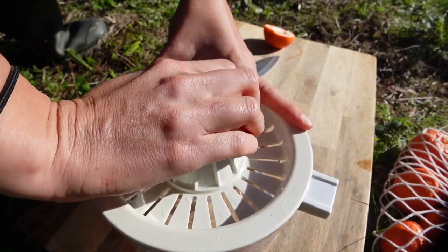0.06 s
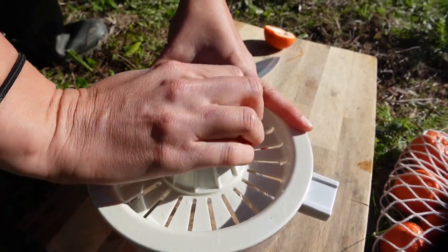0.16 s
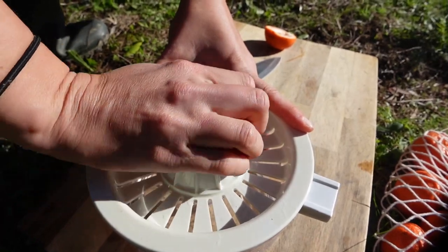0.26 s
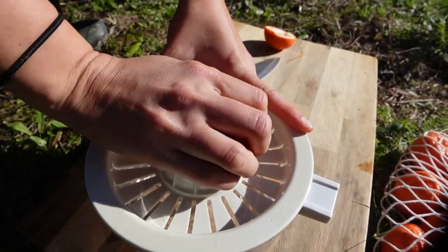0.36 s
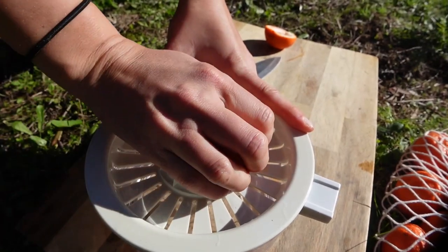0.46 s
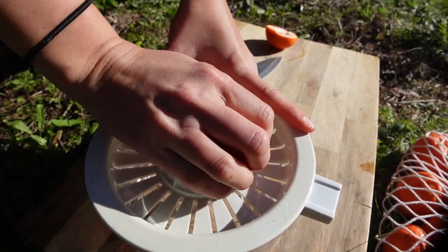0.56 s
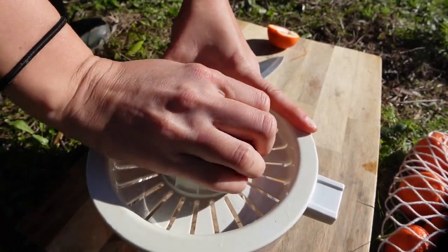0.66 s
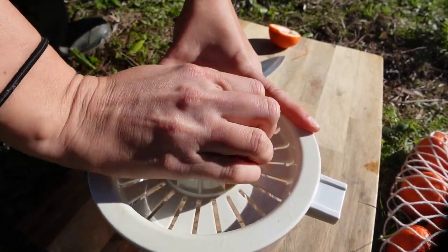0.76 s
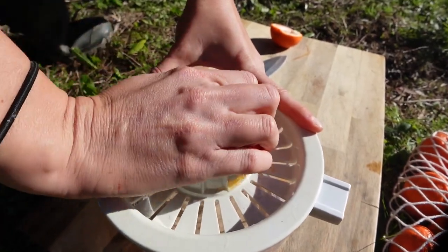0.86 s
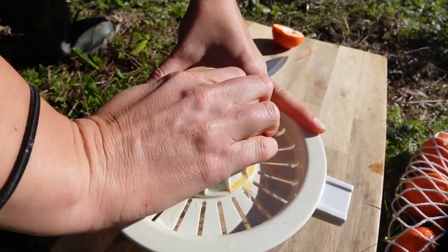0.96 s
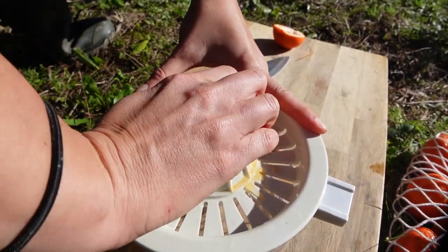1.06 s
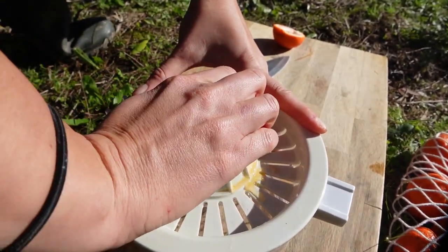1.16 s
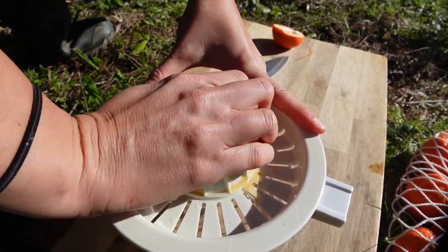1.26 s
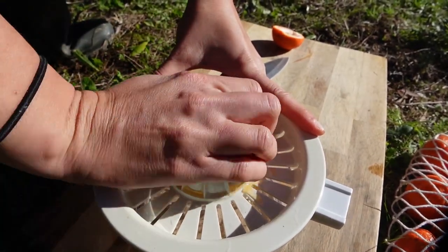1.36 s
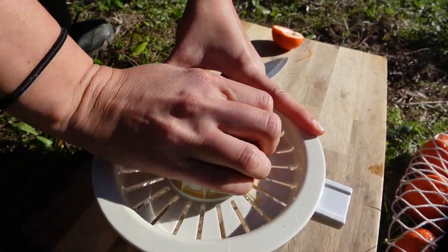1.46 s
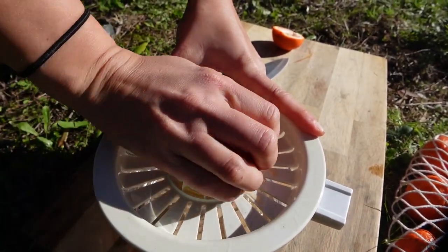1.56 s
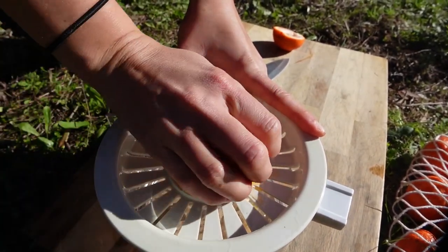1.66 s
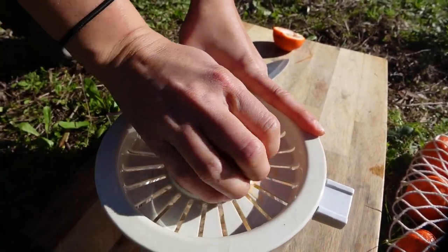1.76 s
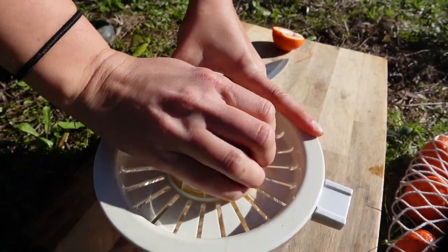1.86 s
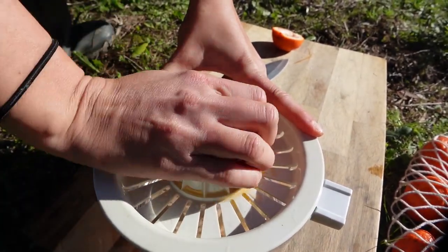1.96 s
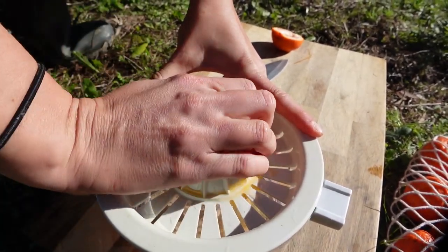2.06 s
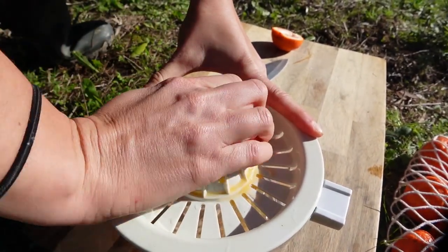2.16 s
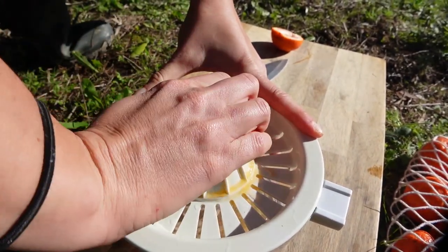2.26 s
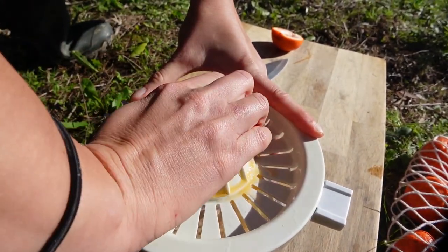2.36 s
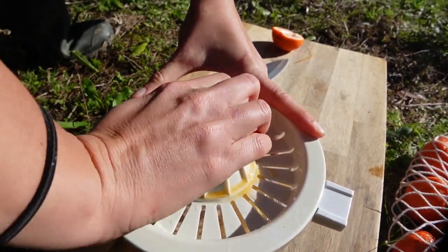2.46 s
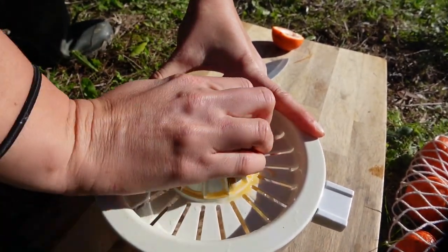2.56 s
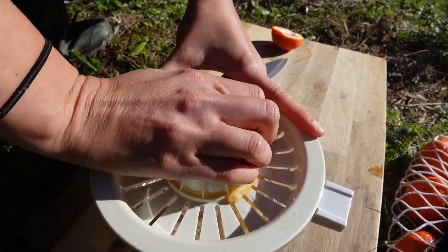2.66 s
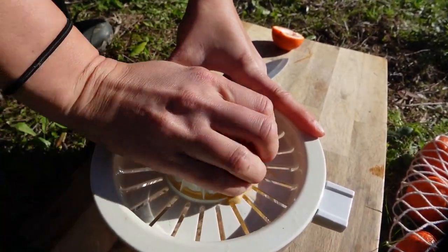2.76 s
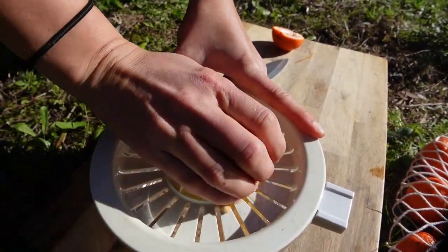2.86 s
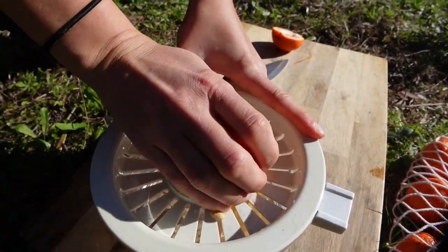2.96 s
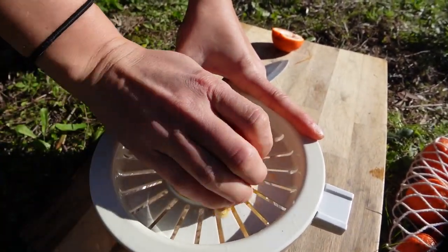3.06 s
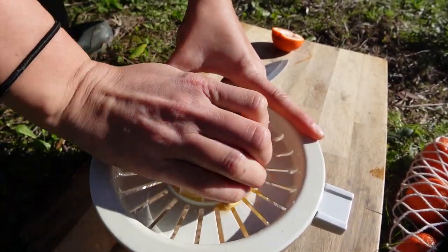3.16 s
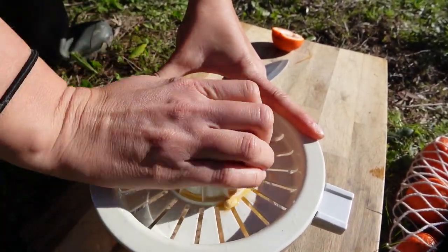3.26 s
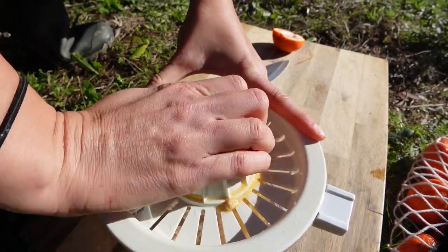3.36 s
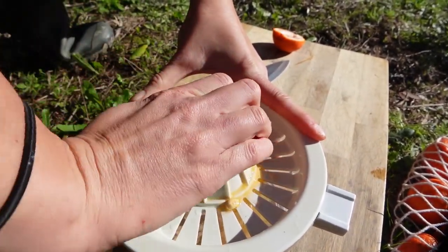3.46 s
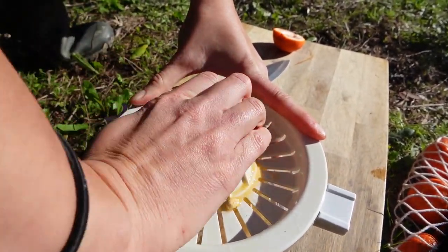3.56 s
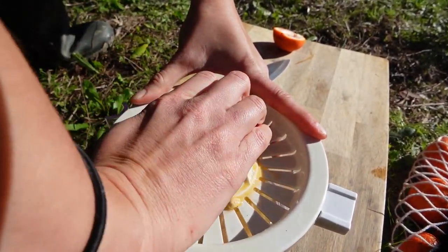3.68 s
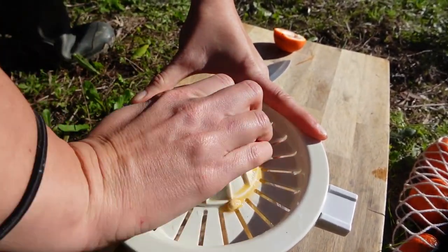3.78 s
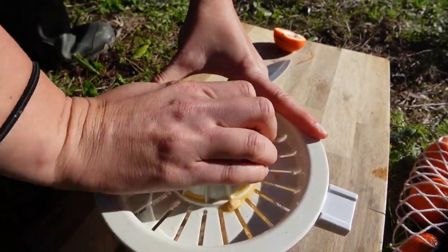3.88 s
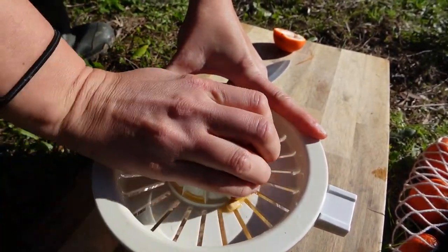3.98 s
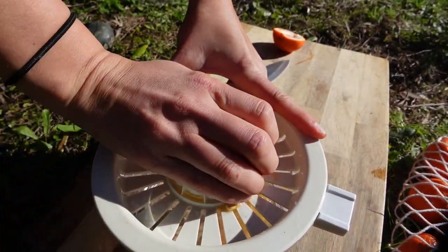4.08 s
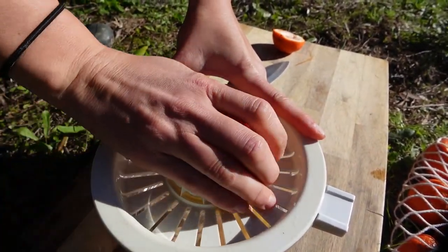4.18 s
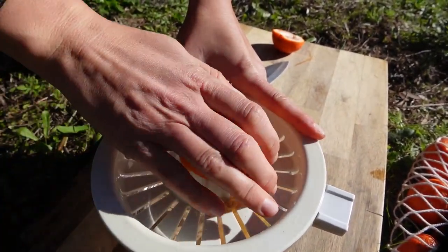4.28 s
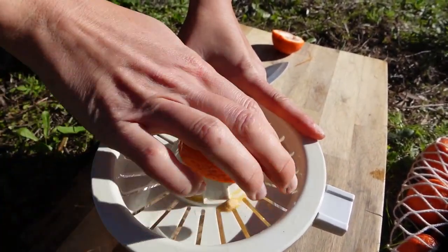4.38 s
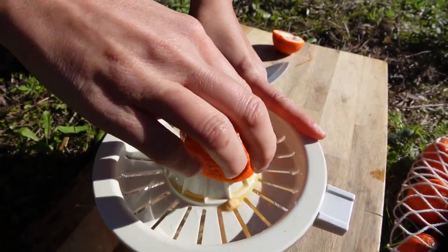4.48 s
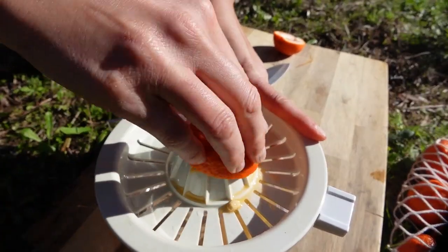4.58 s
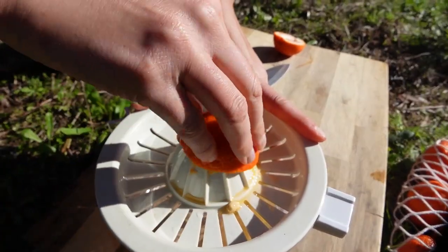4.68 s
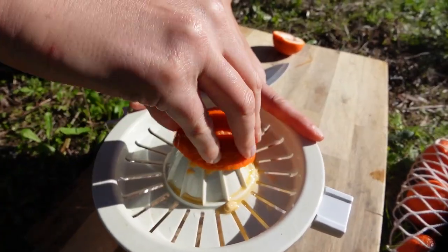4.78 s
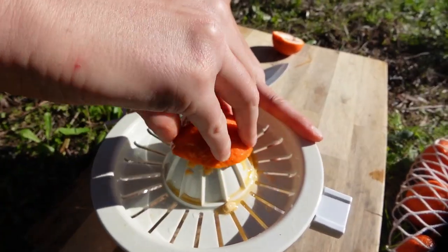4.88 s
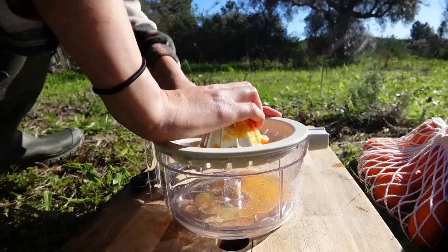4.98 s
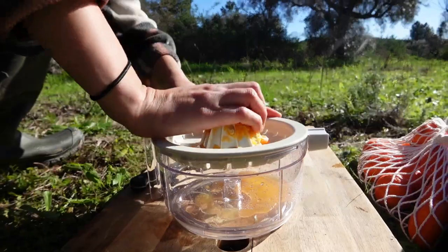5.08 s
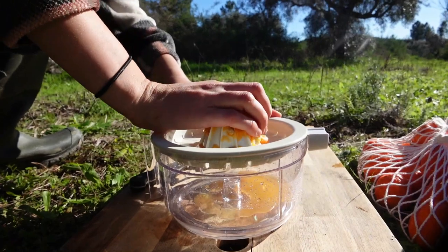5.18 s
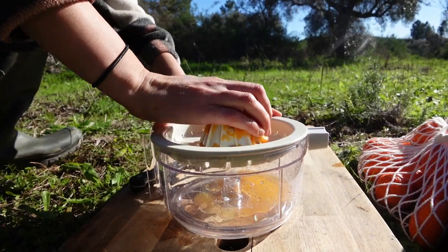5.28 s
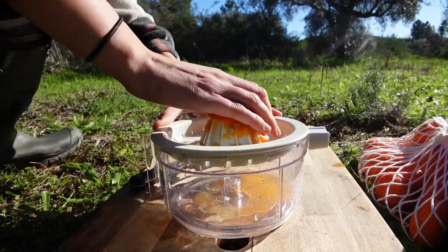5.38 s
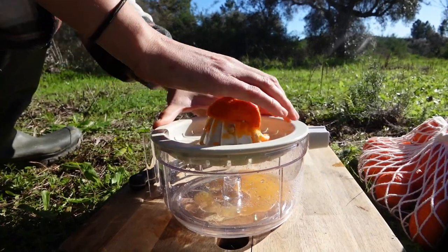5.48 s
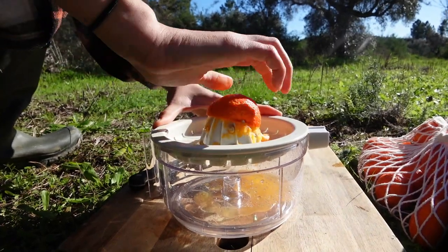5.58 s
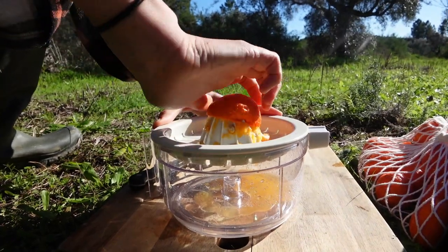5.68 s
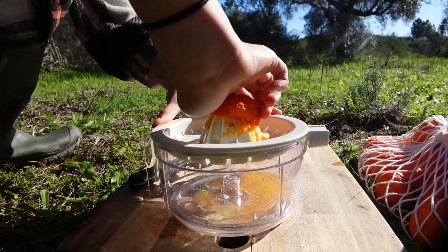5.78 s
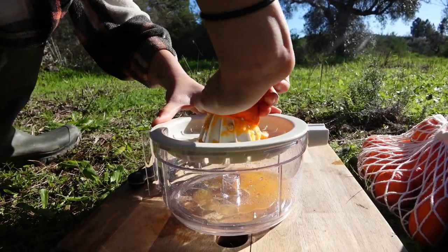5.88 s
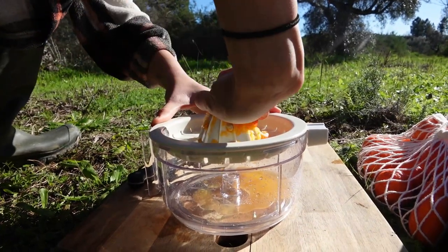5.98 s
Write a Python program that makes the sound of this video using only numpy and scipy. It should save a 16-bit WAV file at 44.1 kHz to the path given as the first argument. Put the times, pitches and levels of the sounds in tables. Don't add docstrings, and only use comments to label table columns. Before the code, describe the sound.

A close, dry outdoor sound of oranges juiced by hand on a ridged plastic reamer. From 0 s wet fibres crackle and ridges tick, with a faint rubbing squeak; a hard clack and crunch at about 0.4-0.5 s is the loudest moment. Knocks follow near 0.7 and 1.0 s, then a cluster of rind snaps from 1.3 to 1.7 s. Around 1.9-2.2 s the lid raps quickly on the bowl, and again at 2.6 s. Twisting continues in juicy surges, with softer hollow knocks at 3.1-3.4 s and sharp cracks at 3.8-4.1 s, thinning after 4.2 s. At 4.85 s the sound changes with the view: short squelches, plastic knocks at 5.0-5.2 s, then lighter tearing and a last push near 6 s. From 5.2 s a small bird repeats raspy, falling scolds about every 0.2 s. A faint field hush and low rumble lie beneath.

```python
import sys
import numpy as np
from scipy import signal
from scipy.fft import rfft, irfft, next_fast_len
from scipy.io import wavfile
from scipy.ndimage import map_coordinates

SR = 44100
rng = np.random.default_rng(int(sys.argv[2]) if len(sys.argv) > 2 else 0)


def store_wav(level_fs):
    pcm = np.round(np.clip(np.atleast_2d(level_fs), -1, 1) * 32767)
    wavfile.write(sys.argv[1], SR, pcm.T.astype(np.int16))


def decibels_to_gain(level_db):
    exponent = np.asarray(level_db, float) / 20
    return 10 ** exponent


N = 265923
VIEW_CHANGE_S = 4.85

# (frequency [Hz], level [dB])
HUSH_SPECTRUM = [(20, -50), (48, -30), (62, -7), (100, -1.5), (344, -4), (641, -2.5), (1500, -3.5),
                 (2400, -8.5), (4250, -7.5), (7000, -18.5), (9570, -19.5), (16000, -23)]
# (time [s], level [dB])
RUMBLE_LEVEL = [(0.0, -64), (0.1, -78), (4.9, -72), (5.2, -80), (5.5, -80), (5.62, -69.5), (5.8, -69.5),
                (5.9, -74.5)]
# (start [s], peak level [dB], first pitch [Hz], share of the usual fading [1])
BIRD_PHRASES = [
    (5.179, -46.5, 4430, -.4),
    (5.3638, -45, 4810, 0.7),
    (5.5582, -43.5, 4870, 1.3),
    (5.7476, -45.5, 4800, 1.0),
    (6.0, -49.5, 4160, 1.5),
]
# (delay [s], level [dB], pitch change [1])
BIRD_NOTES = [
    (0, 0, 0.013),
    (.02, 0, -.01),
    (0.046, -2.5, -.11),
    (.074, -6.5, -.15),
]
# (frequency [Hz], width [Hz], level [dB])
BOWL_MODES = [
    [(297, 79, -6.5), (401, 44, 6), (519, 67, 7), (740, 52, -2.5)],
    [(290, 170, -4), (440, 42, -20), (500, 135, 11.5), (713, 130, 9.5)],
]
# (frequency [Hz], width [Hz], level [dB])
LID_MODES = [
    [(1114, 46, 0), (1226, 30, 1.5), (1349, 83, 3.5), (1570, 170, -6), (2000, 65, -1)],
    [(1108, 78, 4), (1200, 79, 3), (1371, 54, 11), (1600, 84, -0.5), (2220, 120, 0.5)],
]
# (frequency [Hz], width [Hz], level [dB])
RIDGE_MODES = [(2700, 30, 3), (3040, 11, -3.5), (3400, 40, -18), (4480, 330, -5.5), (5300, 280, -22.5),
               (6870, 160, -12)]
# (start [s], length [s])
RUB_TIMES = [(0.0, .55), (.75, .35), (1.4, .4), (4.86, .1)]
RUB_LEVELS = [-69.5, -68, -65, -63.5]
# (time [s], peak level [dB], pitch [Hz])
FIBRE_POPS = [(0.04, -45, 4930), (.1175, -45, 6900), (.134, -49, 7400), (.189, -42.5, 8150),
              (0.2666, -42, 7400), (0.2855, -35.5, 6700), (0.4147, -34.5, 9850), (0.4613, -25, 5300),
              (0.4707, -36, 6400), (0.8347, -46.5, 7300), (.841, -48.5, 10500), (.953, -39.5, 6540),
              (1.316, -29, 4340), (1.516, -39, 5300), (1.578, -32, 3850), (2.095, -40, 6000),
              (2.485, -45, 4300), (2.4902, -38, 4060), (2.6856, -44, 6500), (3.2464, -46, 7140),
              (3.2956, -45, 5660), (3.9503, -40, 9100), (4.2177, -47.5, 9450), (4.326, -47.5, 5850),
              (4.652, -40, 6030), (4.8102, -44, 6240), (4.8977, -46, 4600), (4.9322, -44, 4000),
              (5.3352, -56, 6100), (5.3486, -55.5, 7600)]
CRUSH_STARTS = [.398, 1.772, .283, 3.93, 2.92, 4.915, 5.635, 1.865]
# (length [s], level [dB], pitch [Hz], bowl share [1])
CRUSH_BURSTS = [(0.044, -41, 4100, 0.87), (0.04, -53, 2650, .05), (0.036, -51, 4000, 0.11),
                (0.041, -50.5, 5100, .05), (0.036, -55, 860, 0.16), (0.026, -58, 1100, 0.11),
                (0.033, -64.5, 580, .1), (0.03, -58, 5600, 0.74)]
# (frequency [Hz], level [dB])
PULP_SPECTRUM = [(300, -14), (900, -6), (2000, -1.5), (3500, 2), (4700, 3.5), (6500, 1.5), (9000, -44),
                 (12000, -34), (20000, -75)]
# (frequency [Hz], level [dB])
SPRAY_SPECTRUM = [(3000, -31), (6500, -10.5), (8500, -10.5), (11000, -20.5), (15000, -28), (20000, -50)]
# (start [s], length [s], effort [dB], lid shake re effort [dB], spray re effort [dB])
WRIST_PUSHES = [(0.0, 0.68, -62.5, 0, -6.5), (0.372, 0.12, -53, -2.5, -6), (0.662, 0.23, -63.5, 0, -6.5),
                (0.953, 0.16, -60.5, -1.5, -4.5), (1.347, 0.42, -58, -9.5, -10.5),
                (1.882, 0.3, -55.5, -8, -11.5), (2.192, 0.18, -62, -4, -6.5), (2.544, 0.37, -56.5, -7, -7),
                (2.986, 0.017, -63, 2.5, -6), (3.164, .28, -57, -4, -11), (3.504, 0.13, -61, -5, -4),
                (3.823, 0.28, -56, -5.5, -7), (4.177, 0.15, -65.5, -5.5, -8), (4.43, 0.17, -74.5, 2.5, -9),
                (4.65, 0.17, -64.5, -8.5, -6), (4.9, .07, -62, -1, -3), (5.04, 0.14, -60.5, 0.5, -3.5),
                (5.3, .13, -76, 7.5, -8), (5.458, 0.1, -69.5, -7, -4.5), (5.96, .2, -63.5, -7, -9.5)]
# (time [s], peak level [dB], crack pitch [Hz], lid share [dB], bowl share [dB])
LID_KNOCKS = [(0.4097, -25.5, 2820, -29, -17), (0.4473, -12, 2980, -16, -16),
              (0.7169, -25.5, 4380, -8, -20.5), (0.9889, -19.5, 4530, -12.5, -22),
              (1.034, -22, 4600, -12, -21.5), (1.944, -22.5, 4900, -13.5, -22.5),
              (1.9772, -22, 5100, -11, -22), (2.005, -16.5, 4500, -12.5, -22),
              (2.0338, -27, 3780, -7.5, -14), (2.171, -15, 4460, -10.5, -26),
              (2.6227, -16.5, 4500, -13, -30), (3.136, -31, 3400, .5, -21), (3.2, -33.5, 4900, -5, -17.5),
              (3.2341, -37.5, 4770, 0.5, -13.5), (3.33, -27.5, 2830, -12, -18.5),
              (3.3751, -25.5, 3700, -8.5, -17), (3.865, -24.5, 4500, -13, -31),
              (3.891, -22, 4800, -12, -28), (4.0511, -27.5, 4430, -13, -25.5), (5.026, -37.5, 2000, 3, -10),
              (5.0399, -36, 2350, 0.5, -30), (5.1296, -30.5, 6150, -9, -19), (5.1429, -36.5, 2220, 9, -2),
              (5.2091, -24, 4930, -12.5, -24)]
# (time [s], peak level [dB], crack pitch [Hz], lid share [dB])
RIND_SPLITS = [(.51, -33, 6000, -35), (0.6236, -35.5, 3040, -37), (1.061, -35, 4050, -8.5),
               (1.3031, -24.5, 3300, -18), (1.3243, -24.5, 3900, -25), (1.3856, -49, 4590, -10),
               (1.4028, -26, 4560, -27), (1.4672, -37.5, 4320, -17), (1.5741, -24, 4000, -27),
               (1.6813, -35.5, 3750, -31), (1.7146, -34, 2830, -30), (1.7295, -33, 3300, -32),
               (2.088, -31.5, 4400, -33), (2.1289, -42, 4120, -15), (2.4978, -26.5, 4800, -31),
               (2.5474, -37, 4300, -18), (2.57, -39, 4650, -15), (2.607, -33, 4540, -14),
               (2.8065, -36.5, 4830, -15), (2.923, -46, 3520, -9), (2.9575, -39, 3640, -25),
               (2.9923, -40, 3560, -14), (3.5268, -44, 3340, -3.5), (3.827, -43, 4160, -25),
               (3.849, -39, 2000, -11), (3.91, -24.5, 2820, -12), (3.9404, -21.5, 3880, -40),
               (4.073, -36, 3580, -16), (4.6399, -39, 4600, -26), (4.7707, -40.5, 4530, -39)]
# (time [s], peak level [dB])
RIDGE_PLUCKS = [(0.0301, -34), (0.079, -38), (0.1174, -37.5), (0.133, -40.5), (.156, -41.5), (0.1872, -45),
                (0.2506, -40.5), (0.2835, -34), (.3625, -41), (1.4917, -37), (1.518, -39.5), (1.777, -45),
                (2.8391, -38.5), (2.8938, -48), (2.977, -40.5), (3.048, -45), (3.1132, -39.5),
                (3.408, -39.5), (3.7878, -62), (4.2167, -41.5), (4.8098, -49), (4.8578, -39.5)]

RISE_DB_PER_S, FALL_DB_PER_S = 190, 159
LID_FOLLOWS = 0.82
UNSTEADY_DB = 1.5
PLUCK_HZ, PLUCK_LID_DB, PLUCK_BOWL_DB, PLUCK_EDGE_DB = 2800, -19, -18.5, -12
KNOCK_EDGE_DB, SPLIT_EDGE_DB = -16.5, -51
SPLIT_BOWL_DB = -13
SPLINTER_DB, LID_SPLINTER_DB = -9.5, -10


def unit(x):
    return x / np.sqrt(np.mean(x ** 2) + 1e-20)


def top(x):
    return x / np.abs(x).max(1, keepdims=True)


def shape(points):
    f, v = np.transpose(points)
    return lambda hz: decibels_to_gain(np.interp(np.log(hz + 1), np.log(f), v))


def peak(f, hz, width):
    return 1j * f * width / (hz * hz - f * f + 1j * f * width)


def body(modes):
    return lambda f: sum((-1) ** k * decibels_to_gain(db) * peak(f, hz, w) for k, (hz, w, db) in enumerate(modes))


def ridged(f):
    return 1 + sum(decibels_to_gain(db) * peak(f, hz, w) for hz, w, db in RIDGE_MODES)


def soft(f):
    return 1 / (1 + 1j * f / 9500) ** 3


def filtered(x, response):
    m = next_fast_len(x.shape[-1] + 8192)
    spectrum = rfft(x, m) * response(np.fft.rfftfreq(m, 1 / SR))
    return irfft(spectrum, m)[..., :x.shape[-1]]


def wobble(rate):
    knots = rng.standard_normal(int(N * rate / SR) + 4)
    return map_coordinates(knots, [np.arange(N) * rate / SR])


def placed(rows, seconds):
    at = np.round(seconds * SR).astype(int)[:, None] + np.arange(rows.shape[1])
    return np.bincount(at.ravel(), rows.ravel(), N + SR)[:N]


def grains(per_s, centre_hz, octaves, spread_db, cap_db):
    draw = rng.random((int(per_s * N / SR), 4))
    interval = octaves * (draw[:, [1]] + draw[:, [2]] - 1)
    hz = np.clip(centre_hz * 2 ** interval, 300, 15000)
    size = decibels_to_gain(np.minimum(-spread_db * np.log(draw[:, [3]]), cap_db))
    cycles = hz * np.arange(128) / SR
    rings = np.sin(2 * np.pi * cycles) * cycles * np.exp(-cycles / 1.07)
    return unit(placed(size * rings, draw[:, 0] * N / SR))


def tearing(cells, wet):
    clumps = decibels_to_gain(1.1 * wobble(30) + 1.6 * wobble(140))
    return unit(clumps * (cells + wet * rng.standard_normal(N)))


def field():
    hush = unit(filtered(rng.standard_normal(N), shape(HUSH_SPECTRUM)))
    low = lambda f: peak(f, 120, 227) ** 3 * f ** 2 / (f ** 2 + 60 ** 2)
    rumble = unit(filtered(rng.standard_normal(N), low))
    rumble_db = np.interp(np.arange(N) / SR, *np.transpose(RUMBLE_LEVEL))
    return decibels_to_gain(-67.5 + .6 * wobble(2.49)) * hush + decibels_to_gain(rumble_db + 1.3 * wobble(5)) * rumble


def bird():
    notes = [(start + delay, db + fade * note_db, hz * (1 + max(fade, 0) * change))
             for start, db, hz, fade in BIRD_PHRASES
             for delay, note_db, change in BIRD_NOTES]
    s, db, hz = np.transpose(notes)[..., None]
    t, note_s, fall_per_s = np.arange(1400) / SR, 0.0164, 8
    flutter = filtered(rng.standard_normal((len(s), 2, len(t))), lambda f: 1 / (1 + 1j * f / 950) ** 3)
    flutter = flutter / flutter.std()
    phase = 2 * np.pi * np.cumsum(hz * (1 + fall_per_s * (note_s / 2 - t)), axis=1) / SR
    buzz = 1 + np.cos(2 * np.pi * 440 * t + 2 * flutter[:, 1, -1:])
    note = (.8 * buzz + flutter[:, 0]) * np.sin(phase) + flutter[:, 1] * np.cos(phase)
    swell = np.sin(np.pi * np.clip(t / note_s, 0, 1) ** .7) ** .5
    direct = placed(decibels_to_gain(db) * top(swell * note), s[:, 0] - .001)
    leaf_t = np.arange(SR // 5) / SR
    leaves = rng.standard_normal(SR // 5) * decibels_to_gain(-60 * leaf_t / 0.097)
    scattered = signal.fftconvolve(direct, leaves / np.linalg.norm(leaves))[:N]
    return direct + decibels_to_gain(-8) * scattered


def rubs():
    s, length = np.transpose(RUB_TIMES)[..., None]
    swell = np.sin(np.pi * np.clip((np.arange(N) / SR - s) / length, 0, 1)) ** .4
    friction = tearing(grains(300, 2580, octaves=0.2, spread_db=4.5, cap_db=16), wet=.6)
    ring = filtered(friction, lambda f: peak(f, PLUCK_HZ, 150))
    return decibels_to_gain(RUB_LEVELS) @ swell * unit(ring)


def ticks():
    s, db, hz = np.transpose(FIBRE_POPS)[..., None]
    t = np.arange(512) / SR
    burst = rng.standard_normal((len(s), len(t))) * decibels_to_gain(-60 * t / 0.015)
    pops = filtered(burst, lambda f: peak(f, hz, .33 * hz) ** 2)
    return placed(decibels_to_gain(db) * top(pops), s[:, 0])


def crushes():
    length, db, hz, bowl = np.transpose(CRUSH_BURSTS)[..., None]
    t = np.arange(4096) / SR
    lumps = rng.standard_normal((len(db), 128)).repeat(32, axis=1)
    pops = rng.standard_normal((len(db), len(t))) * decibels_to_gain(2.3 * lumps)

    def path(f):
        direct = peak(f, hz, 0.67 * hz) * soft(f) * ridged(f)
        return direct + 0.33 * body(LID_MODES[0])(f) + bowl * body(BOWL_MODES[0])(f)

    pops = filtered(pops, path)
    swell = np.sin(np.pi * np.clip(t / length, 0, 1)) ** 0.27
    return placed(decibels_to_gain(db) * swell * pops / pops.std(1, keepdims=True), np.array(CRUSH_STARTS))


def plastic_hum(shake, view):
    lid = filtered(shake, lambda f: body(LID_MODES[view])(f) + decibels_to_gain(5.0) * peak(f, 2710, 147))
    bowl = filtered(shake, body(BOWL_MODES[view]))
    return unit(lid + decibels_to_gain(-3.5) * bowl)


def twist():
    s, length, db, lid_db, spray_db = np.transpose(WRIST_PUSHES)[..., None]
    t = np.arange(N) / SR
    before, after = np.clip(s - t, 0, None), np.clip(t - s - length, 0, None)
    slack_db = RISE_DB_PER_S * before + FALL_DB_PER_S * after
    effort = decibels_to_gain(UNSTEADY_DB * wobble(7.6)) * decibels_to_gain(db - slack_db).max(0)
    shaking = decibels_to_gain(UNSTEADY_DB * wobble(9)) * decibels_to_gain(db + lid_db - LID_FOLLOWS * slack_db).max(0)
    juice = decibels_to_gain(UNSTEADY_DB * wobble(7.6)) * decibels_to_gain(db + spray_db - slack_db).max(0)

    shake = tearing(grains(700, 1300, octaves=2.2, spread_db=3, cap_db=8), wet=1.4)
    hum = np.where(t < VIEW_CHANGE_S, plastic_hum(shake, 0), plastic_hum(shake, 1))
    pulp = tearing(grains(1800, 4580, octaves=1.97, spread_db=0.0, cap_db=3.5), wet=0.92)
    crackle = unit(filtered(pulp, lambda f: shape(PULP_SPECTRUM)(f) * ridged(f)))
    drops = tearing(grains(1300, 8040, octaves=0.89, spread_db=-0.5, cap_db=7.5), wet=1.0)
    spray = unit(filtered(drops, lambda f: shape(SPRAY_SPECTRUM)(f) * ridged(f)))
    pops = unit(filtered(grains(90, 4630, octaves=1.3, spread_db=5.5, cap_db=11.5), ridged))
    return effort * (crackle + decibels_to_gain(-10.5) * pops) + juice * spray + shaking * hum


def breaks():
    knocks = [(*row, KNOCK_EDGE_DB) for row in LID_KNOCKS]
    splits = [(*row, row[-1] + SPLIT_BOWL_DB, SPLIT_EDGE_DB) for row in RIND_SPLITS]
    plucks = [(*row, PLUCK_HZ, PLUCK_LID_DB, PLUCK_BOWL_DB, PLUCK_EDGE_DB) for row in RIDGE_PLUCKS]
    return knocks + splits + plucks


def snaps():
    s, db, hz, lid_db, bowl_db, edge_db = np.transpose(breaks())[..., None]
    t = np.arange(4096) / SR
    view = (s[:, 0] > VIEW_CHANGE_S) * 1
    chance = rng.standard_normal((len(s), 3, len(t)))
    chance[:, :, 6:9] += 4.5
    luck_db = rng.normal(0, 2.2, (len(s), 10))

    def burst(k, t60, tail_db=SPLINTER_DB):
        decay = decibels_to_gain(-60 * t / t60) + decibels_to_gain(tail_db - 60 * t / 0.073)
        return chance[:, k] * (1 - np.exp(-t / 0.000091)) * decay

    def ring(sets):
        modes = np.array(sets)[view].transpose(1, 2, 0)[..., None]
        return lambda f: sum((-1) ** k * decibels_to_gain(m[2] + luck_db[:, [k]]) * peak(f, m[0], m[1])
                             for k, m in enumerate(modes))

    crack = top(filtered(burst(0, 0.026), lambda f: peak(f, hz, 0.66 * hz) ** 2 * soft(f) * ridged(f)))
    edge = top(filtered(burst(0, 0.00099), lambda f: peak(f, 6300, 4500) ** 2 * soft(f) * ridged(f)))
    lid_ring, bowl_ring = ring(LID_MODES), ring(BOWL_MODES)
    lid = top(filtered(burst(1, 0.003, LID_SPLINTER_DB), lambda f: lid_ring(f) * soft(f)))
    bowl = top(filtered(burst(2, 0.039), lambda f: bowl_ring(f) * peak(f, 600, 480)))
    rows = crack + decibels_to_gain(edge_db + 10.5) * edge + decibels_to_gain(lid_db - 0.5) * lid + decibels_to_gain(bowl_db + 1.0) * bowl
    return placed(decibels_to_gain(db - 0.5) * rows, s[:, 0] + .0005)


def scene():
    return (field() + bird() + rubs() + ticks() + crushes() + twist() + snaps())[None]


def band_limit(x):
    return signal.sosfilt(signal.butter(12, 16410, fs=SR, output="sos"), x)


def record(dry):
    mix = filtered(dry, lambda hz: hz < 15900)
    return band_limit(mix)


dry = scene()
out = record(dry)
store_wav(out)
```